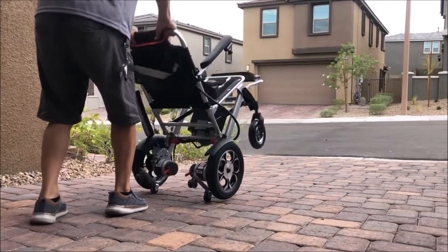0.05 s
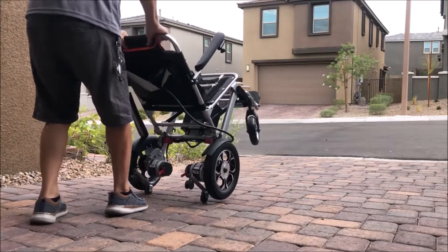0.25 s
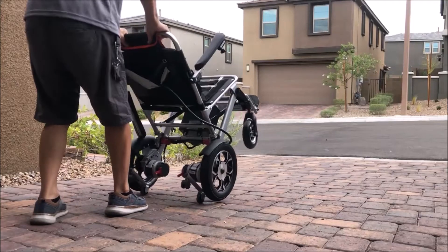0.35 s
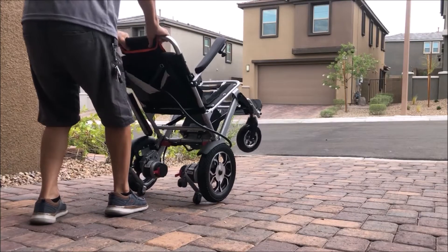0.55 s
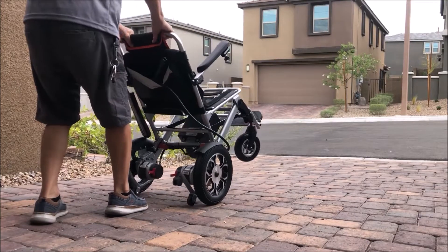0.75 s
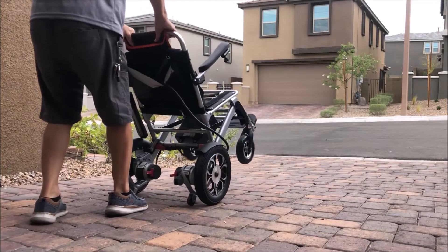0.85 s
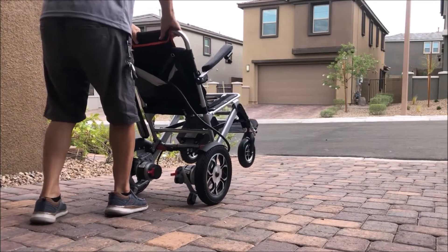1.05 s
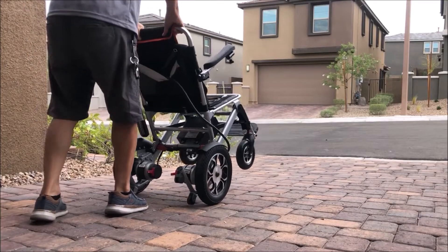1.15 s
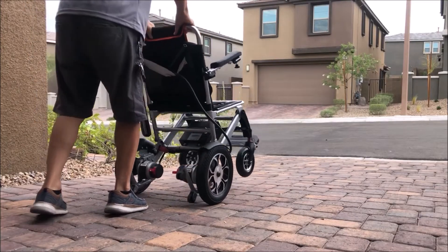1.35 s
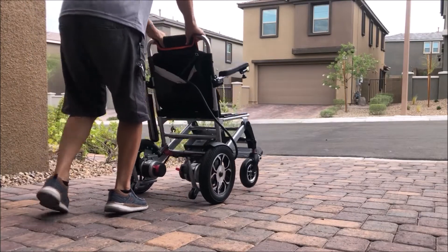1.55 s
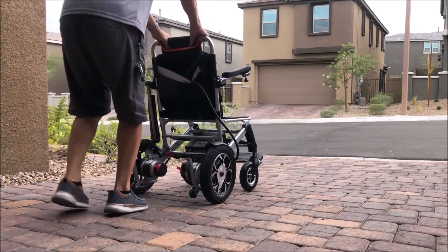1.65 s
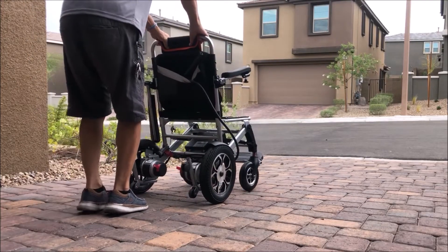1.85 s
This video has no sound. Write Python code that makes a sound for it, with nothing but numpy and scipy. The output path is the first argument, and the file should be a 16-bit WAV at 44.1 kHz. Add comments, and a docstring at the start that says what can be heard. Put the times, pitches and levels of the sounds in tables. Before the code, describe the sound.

Close by outdoors, a wheelchair's metal frame gives a loud clack, a few lighter knocks and ticks, and another short rattle as it is set down. Rubber tyres scrape softly on the paving stones underneath.

```python
"""Wheelchair tipped on a driveway

A metal wheelchair is tipped back on pavers, held, and set down on its front casters. Impacts excite damped
modes: tubes ring briefly while slack joints clack and chatter. Tyres and a shoe make friction noise; the
chair's metal ticks sharply. House walls reflect the blows; a machine hums far off."""
import sys
import numpy as np
from scipy import signal
from scipy.fft import rfft, irfft, next_fast_len
from scipy.io import wavfile
from scipy.ndimage import map_coordinates

SR = 44100
rng = np.random.default_rng(int(sys.argv[2]) if len(sys.argv) > 2 else 0)


def store_pcm(level_fs):
    """Save levels as 16-bit WAV."""
    pcm = np.round(np.clip(level_fs, -1, 1) * 32767).astype(np.int16)
    wavfile.write(sys.argv[1], SR, np.atleast_2d(pcm).T)


N = 83790
TOP_HZ = 15900


def heavy_blows():
    """Impact excitation: a blow rings tubes, joint and caster fork, and bounces the chair on its tyres."""
    # (time [s], level [dB], bass [dB], thud [dB], knock [dB], sizzle [dB], decay stretch [factor],
    # struck spot [Hz], spot [dB], bounce [Hz], bounce [dB], tubes [dB], joint [dB], fork [dB], chatter [dB])
    blows = [(0.2864, -20.5, -8.5, -10.5, -1, -1, 0.62, 4202, -19, 163, -35.5, -34.5, -28.5, -59, -38),
             (0.6090, -29.5, -7, 1, -0.5, -14, 0.7, 990, -26.5, 174, -36, -36.5, -39, -69, -55),
             (0.8596, -35, -30, -7, 1, 1, 0.63, 2020, -44, 172, -62, -51, -54, -63, -61),
             (1.5970, -30, -13.5, -11.5, 1, -8, 1.3, 1016, -22, 217, -35, -32, -53, -34, -38.5)]
    # modes of the frame tubes, slack joint and caster fork: (frequency [Hz], level [dB], t60 [s])
    tube_modes = [(250, -11, .12), (309, -3, .18), (390, 0, .15), (440, -7, .1), (538, -7, .18),
                  (684, -14, .15), (780, -6, .13), (930, -9, .14), (1045, -7, .09), (1165, -6, .11),
                  (1392, -8, .15)]
    joint_modes = [(2060, -9, .1), (2110, -7, .08), (2264, -7, .08), (2790, -11, .13), (3346, -2, .09),
                   (3556, -7, .07), (3833, -9, .11), (4190, -1, .08), (4420, -7, .1), (4670, -16, .11),
                   (6330, -14, .08), (8800, -15, .07)]
    fork_modes = [(1535, 0, .1), (1790, -7, .09), (2062, -1, .15), (2150, -3, .1), (2638, -6, .14),
                  (2799, -3, .16), (4371, -5, .1), (4818, -5, .1), (5080, -6, .1), (9485, -10, .08)]
    out = np.zeros(N)
    for (s, db, bass, thud, knock, sizzle, stretch, spot_hz, spot_db,
         bounce_hz, bounce_db, tube_db, joint_db, fork_db, chatter_db) in blows:
        blow = amp(tube_db) * ring(tube_modes)
        blow += amp(joint_db) * ring(joint_modes)
        blow += amp(fork_db) * ring(fork_modes)
        blow += amp(chatter_db) * chatter()
        blow += resonance(spot_hz, spot_db, t60=0.036)
        blow += resonance(bounce_hz, bounce_db, t60=0.13)
        add(blow, 0, contact(db, bass, thud, knock, sizzle, stretch, spot_hz))
        add(out, s, with_walls(blow))
    return out


def light_knocks():
    """Free vibration: loose parts knock, and the footrest and struck spot ring at their own pitches."""
    # (time [s], level [dB], thud [dB], knock [dB], sizzle [dB], decay stretch [factor],
    # struck spot [Hz], spot [dB])
    knocks = [(0.0269, -40.5, -2, -14, -4.5, 0.79, 664, -37.5), (0.038, -38, -3, -15, -15, 0.84, 414, -52),
              (0.0955, -37.5, -12, 1.5, -9, 0.43, 1175, -40.5),
              (0.1699, -37.5, -18, -1.5, -20, 0.49, 1323, -39.5),
              (0.196, -41.5, -6, -8, -39, 1.1, 1160, -47), (0.208, -39.5, -5.5, -4, -6, 1.3, 1474, -39),
              (0.222, -32.5, -9, 0, -3, 0.4, 3230, -41), (0.2594, -28, -18, -10.5, -6.5, 0.8, 1364, -34.5),
              (0.6404, -48, 4, -2, -22, 2.7, 539, -42), (0.814, -56, -3.5, -1.5, -40, 6, 820, -53),
              (0.9094, -42.5, -6, 5, -7, 1.13, 4030, -45), (0.9154, -42.5, 4, -6, -15, 0.32, 983, -39.5),
              (0.925, -36.5, -15, -40, -10, 0.61, 4450, -44), (0.9347, -42, -7, -16, -20, 1.1, 2760, -49),
              (0.9617, -47, 0.5, -7, -23, 1.95, 847, -43), (1.0406, -48, 1, 3.5, -9, 1.4, 846, -43),
              (1.073, -54, -13, 0, -25.5, 3.8, 870, -67), (1.133, -51.5, 5, 0.5, -3.5, 1, 1050, -59),
              (1.678, -45, -4.5, 1, -41, 1.25, 880, -43), (1.6969, -35.5, -30, -25, -23, 0.49, 3750, -45.5),
              (1.747, -56, 11, 6, -42, 2.1, 870, -47.5), (1.7563, -48.5, -6, 5.5, 0.5, 1.03, 1020, -55),
              (1.846, -54, -10, 4, -11, 0.49, 2070, -57), (1.869, -64, 7.5, 19, -16, 0.77, 1294, -55)]
    # modes of the loose footrest: (frequency [Hz], level [dB], t60 [s])
    footrest_modes = [(354, -6.5, 0.16), (382, 1.5, 0.087), (853, -4, 0.058), (1032, -20, 0.18),
                      (1325, -9.5, 0.064), (1508, -4.5, 0.064), (2770, -13.5, 0.11), (4480, -23.5, 0.26)]
    out = np.zeros(N)
    for s, db, thud, knock, sizzle, stretch, spot_hz, spot_db in knocks:
        blow = amp(db + thud) * ring(footrest_modes) + resonance(spot_hz, spot_db, t60=0.057)
        add(blow, 0, contact(db, thud - 3, thud - 6, knock, sizzle, stretch))
        add(out, s, with_walls(blow))
    return out


def contact(db, bass_db, thud_db, knock_db, sizzle_db, stretch, spot_hz=None, count=8192):
    """Modal overlap: the struck frame's crowded resonances merge into bands of decaying noise."""
    # the frame's dense response: (frequency [Hz], level [dB], rise [s], t60 before stretching [s])
    bands = [(92, -56, 0.0044, 0.117), (180, -2.5, 0.0014, 0.28), (272, 0, 0.0023, 0.1),
             (430, -5, 0.0023, 0.19), (620, 2, 0.0036, 0.076), (960, 2, 0.0012, 0.038),
             (1960, -4.5, 0.00044, 0.12), (3900, -0.5, 0.000057, 0.054), (6800, 0.5, 0.0005, 0.075),
             (15000, -4, 0.00049, 0.08)]
    hz, band_db, rise, t60 = np.transpose(bands)
    t, f = seconds(count), np.fft.rfftfreq(count, 1 / SR)
    dulling_db = 0.3 * min(db + sizzle_db + 25, 0)  # contacts softer than -25 dB lose their top
    tone_db = along([(183, bass_db), (395, thud_db), (890, knock_db), (3580, 0),
                     (10430, sizzle_db), (TOP_HZ, sizzle_db + dulling_db)], f)
    if spot_hz:
        peak_db, width_octaves = 8, 0.16
        tone_db += peak_db * np.exp(-.5 * (np.log2((f + 1) / spot_hz) / width_octaves) ** 2)
    phases = np.exp(2j * np.pi * rng.random(len(f)))
    pink_slope = np.sqrt(count * SR / 2 / (f + hz[0]))
    spectrum = phases * pink_slope * amp(db + tone_db)
    band_gains = np.array([along(np.c_[hz, row], f) for row in np.diag(amp(band_db))])
    envelopes = (1 - np.exp(-t / rise[:, None])) * fade(t, stretch * t60[:, None])
    clack = (irfft(spectrum * band_gains) * envelopes).sum(0)
    return highpass(clack, hz=140)  # thin tubes radiate little below this


def ring(modes, count=16384, rise_s=0.0034):
    """Modal superposition: damped sines add, with new levels and phases at every blow."""
    t = seconds(count)
    hz, db, t60 = np.transpose(modes)[:, :, None]
    level = amp(db + 1.97 * rng.standard_normal(hz.shape))
    waves = np.sin(2 * np.pi * (hz * t + rng.random(hz.shape)))
    return (level * waves * fade(t, t60)).sum(0) * (1 - np.exp(-t / rise_s))


def resonance(hz, db, t60, count=16384):
    """A damped oscillator: one mode swells over about a cycle and dies."""
    t = seconds(count)
    return amp(db) * np.sin(2 * np.pi * hz * t) * fade(t, t60) * (1 - np.exp(-t * hz))


def chatter(count=16384, taps_per_s=710, tap_decay_s=0.0015, rise_s=0.012):
    """Shot noise: loose fittings collide at random after a blow, and their taps fuse into a buzz."""
    # spectrum of the fittings: (frequency [Hz], level [dB])
    colour = [(150, -13), (400, 2.5), (1200, 7), (2800, -1), (4500, 2), (8000, -8), (16000, -16)]
    t = seconds(count)
    taps = (rng.random(count) < taps_per_s / SR) * rng.uniform(0.82, 1, count)
    energy = signal.lfilter([1], [1, -np.exp(-1 / (tap_decay_s * SR))], taps)
    buzz = unit(coloured(np.sqrt(energy) * rng.standard_normal(count), colour))
    return buzz * fade(t, t60=0.28) * (1 - np.exp(-t / rise_s))


def snaps(count=2048, snap_cycles=2.1):
    """Damped transients: the chair's metal gives sharp dry snaps, each with a short noisy tail."""
    # snaps and ticks: (time [s], level [dB], pitch [Hz], tail gain [dB])
    ticks = [(0.081, -36, 7000, -15), (0.413, -20, 3500, -39), (0.469, -38, 12700, -9),
             (0.493, -46.5, 12000, -9), (0.572, -45, 9100, -9.5), (0.6025, -39.5, 5500, -10),
             (0.804, -37, 10100, -8.5), (0.812, -42, 8500, -11), (0.824, -40, 14100, -12),
             (0.9277, -35, 5100, -19), (1.206, -43.5, 6500, -10), (1.5932, -39, 6500, -7)]
    out, t = np.zeros(N), seconds(count)
    for s, db, hz, tail_db in ticks:
        snap = np.cos(2 * np.pi * hz * t) * fade(t, snap_cycles / hz)
        tail = amp(tail_db) * rng.standard_normal(count) * fade(t, t60=0.02)
        add(out, s, amp(db) * np.convolve(snap, np.r_[1, tail]))
    return highpass(out, hz=1760)


def tyres(roughness_db=2):
    """Rolling noise: rubber grinds unevenly on the rough pavers while the chair moves."""
    # course of the rolling: (time [s], level [dB])
    levels = [(0, -46.5), (0.051, -47.5), (0.078, -55), (0.129, -46.5), (.22, -45.5), (.29, -41.5),
              (.40, -51.5), (.52, -61), (.9, -57), (1.1, -68.5), (1.249, -66.5), (1.579, -64.5),
              (1.68, -54.5), (1.79, -60), (1.9, -64)]
    # spectrum of rubber on stone: (frequency [Hz], level [dB])
    colour = [(40, -21), (110, -3.5), (190, 3.5), (400, 3), (750, -4), (1400, -5.5), (2000, -9.5),
              (3200, -10.5), (8000, -18.5), (16000, -26)]
    grind = rng.standard_normal(N) * amp(roughness_db * wobble(220))
    return unit(coloured(grind, colour)) * amp(np.interp(seconds(N), *np.transpose(levels)))


def shoe(rise_s=0.0018):
    """Sliding friction: a sole scuffs the stone in a short burst of noise."""
    # (time [s], length of the hold and of the fade [s], level [dB])
    scuffs = [(1.8836, .03, -45)]
    # spectrum of the scuff: (frequency [Hz], level [dB])
    colour = [(300, 7), (1500, -5), (3500, 0.5), (7000, 4), (12000, -5), (16000, -6)]
    stroke = sum(amp(db) * np.interp(seconds(N), [s, s + rise_s, s + length, s + 2 * length], [0, 1, 1, 0])
                 for s, length, db in scuffs)
    return stroke * unit(coloured(rng.standard_normal(N), colour))


def with_walls(x, delay_s=0.012):
    """Diffuse reflection: house walls follow the direct sound with a decaying tail."""
    # reverberation time: (frequency [Hz], t60 [s])
    decays = [(150, 0.11), (500, 0.17), (2500, 0.47), (4500, 0.53), (7000, 0.4), (15000, 0.42)]
    # strength of the reflections: (frequency [Hz], level [dB])
    colour = [(100, -21), (400, -5.5), (1000, -13.5), (3000, -11), (4400, -15), (6000, -14), (9000, -18),
              (15000, -30)]
    hz, t, noise = signal.stft(rng.standard_normal(SR // 2), SR, nperseg=256)
    t60 = along(decays, hz)[:, None]
    gain = amp(along(colour, hz))[:, None] * np.sqrt(2 * np.log(1000) / (t60 * SR))
    tail = signal.istft(noise * gain * fade(t, t60), SR, nperseg=256)[1]
    return signal.fftconvolve(x, np.r_[1, np.zeros(int(delay_s * SR)), tail])


def street(waver_db=2, drift_rad=0.51, air_db=-64.5):
    """Random modulation: a distant machine's hum wavers in level and phase over quiet air."""
    # partials of the hum: (frequency [Hz], level [dB])
    partials = [(86.8, -68.5), (116.5, -71.5), (293, -75.5)]
    # swell of the hum: (time [s], gain [dB])
    swell = [(0, -12), (.2, 2), (.5, 1), (.7, 4.5), (.82, 6), (1.0, 3.5), (1.3, 0.5), (1.7, -0.5), (1.9, 3)]
    # spectrum of the air: (frequency [Hz], level [dB])
    air_colour = [(20, -47), (45, -1.5), (75, 2), (140, -5.5), (290, -3.5), (480, -19), (1000, -18.5),
                  (2100, -41.5), (6000, -33.5), (15500, -34)]
    t = seconds(N)
    hum = sum(amp(db + waver_db * wobble(6.05)) * np.sin(2 * np.pi * hz * t + drift_rad * wobble(3.89))
              for hz, db in partials)
    air = unit(coloured(rng.standard_normal(N), air_colour))
    return np.sqrt(2) * hum * amp(np.interp(t, *np.transpose(swell))) + amp(air_db) * air


def amp(db):
    """Decibels to amplitude ratio."""
    return 10 ** (np.asarray(db) / 20)


def unit(x):
    """Normalisation to rms 1."""
    return x / np.sqrt(np.mean(x ** 2) + 1e-20)


def along(points, hz):
    """Interpolation of (frequency [Hz], value) points on a log axis."""
    f, v = np.transpose(points)
    return np.interp(np.log(hz + 1), np.log(f + 1), v)


def seconds(count):
    """Uniform sampling times."""
    return np.arange(count) / SR


def fade(t, t60):
    """Exponential decay, 60 dB in t60 seconds."""
    return np.exp(-np.log(1000) * t / t60)


def wobble(rate):
    """A smooth random spline, rate knots a second."""
    return map_coordinates(rng.standard_normal(2048), [seconds(N) * rate], mode="wrap")


def coloured(x, colour):
    """Spectral shaping by a (frequency [Hz], level [dB]) curve."""
    return irfft(rfft(x) * amp(along(colour, np.fft.rfftfreq(len(x), 1 / SR))), len(x))


def highpass(x, hz):
    """Second-order roll-off below hz."""
    return signal.sosfilt(signal.butter(2, hz, "highpass", fs=SR, output="sos"), x)


def add(track, s, sound):
    """Superposition of a sound on a track at time s."""
    i = int(np.clip(round(s * SR), 0, N - 1))
    track[i:i + len(sound)] += sound[:N - i]


def scene():
    """Superposition: the pressures of all sources add at one microphone."""
    return (heavy_blows() + light_knocks() + snaps() + shoe() + tyres() + street())[None]


def record(dry):
    """Band limiting: nothing above TOP_HZ passes."""
    size = next_fast_len(N + SR // 2)
    passband = np.fft.rfftfreq(size, 1 / SR) < TOP_HZ
    return irfft(rfft(dry, size) * passband, size)[..., :N]


dry = scene()
out = record(dry)
store_pcm(out)
```